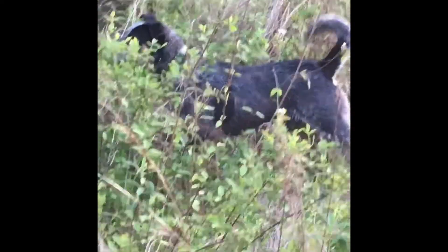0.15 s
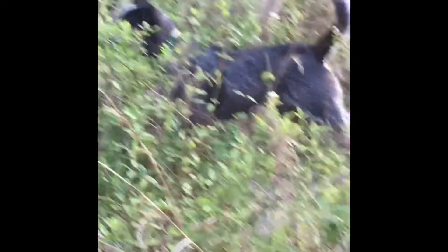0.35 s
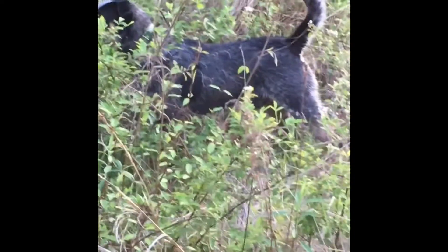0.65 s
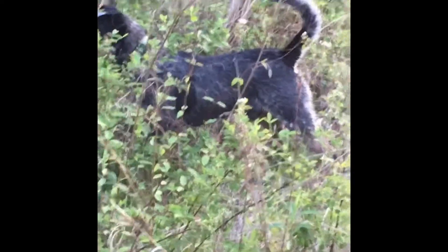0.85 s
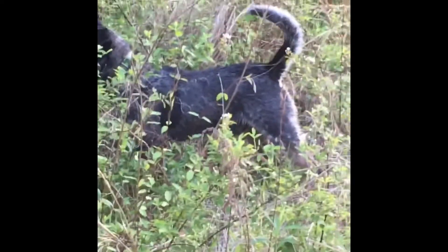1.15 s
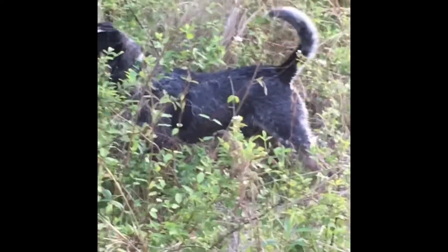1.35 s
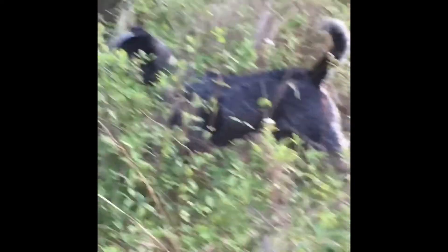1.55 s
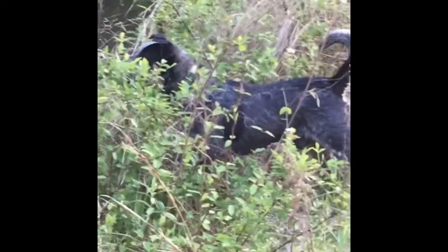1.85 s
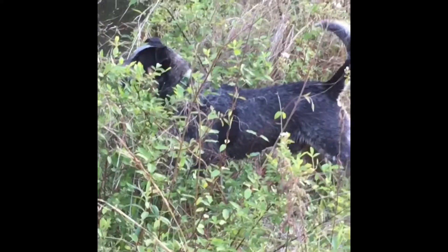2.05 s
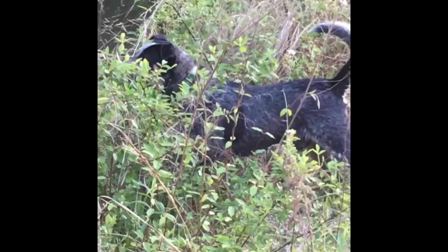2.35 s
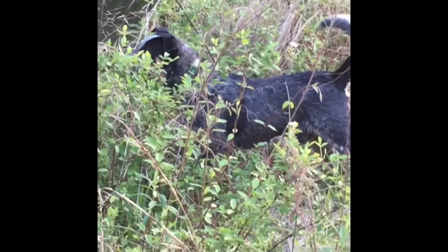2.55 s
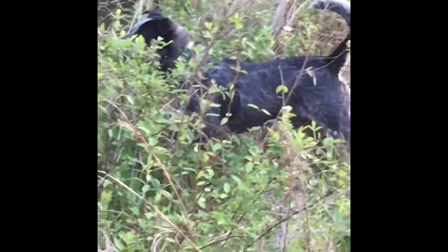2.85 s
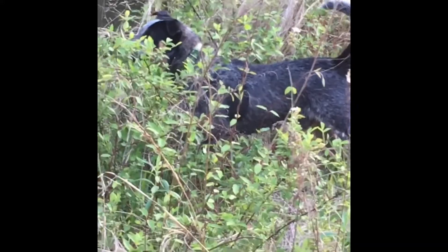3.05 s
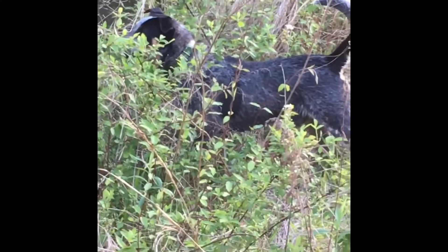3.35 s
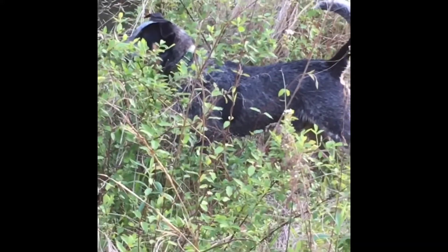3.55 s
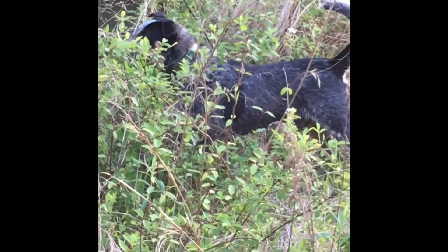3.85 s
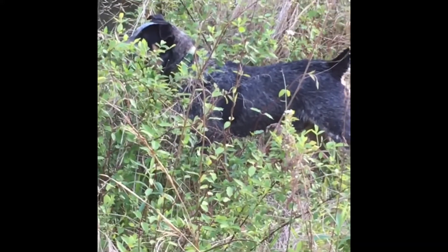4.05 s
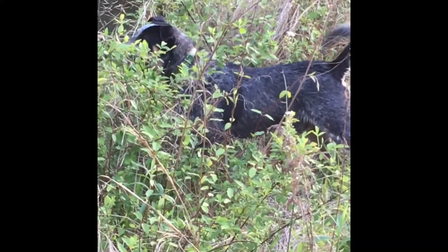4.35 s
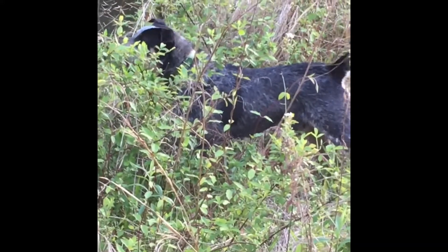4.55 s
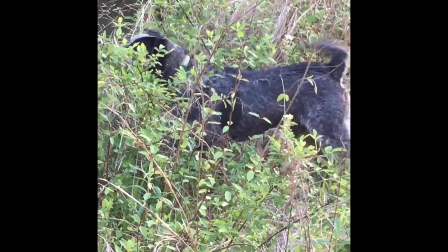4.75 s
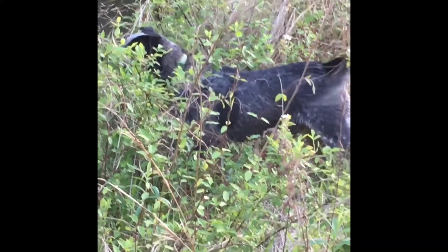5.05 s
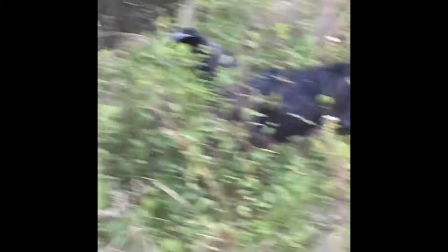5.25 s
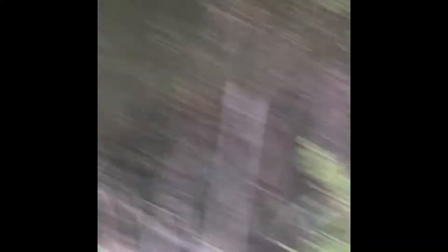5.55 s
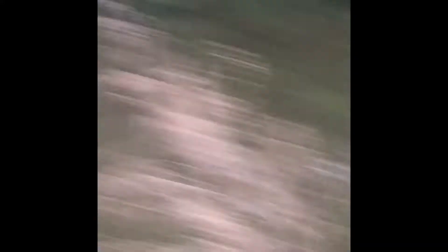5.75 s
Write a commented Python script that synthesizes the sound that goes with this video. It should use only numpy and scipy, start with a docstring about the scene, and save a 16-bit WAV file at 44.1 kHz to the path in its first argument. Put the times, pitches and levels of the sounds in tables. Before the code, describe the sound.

Outdoors by a pond, crickets and katydids drone over low wind rumble; late on, a large dog barks twice, sharp and very loud.

```python
"""On the bank of a pond, crickets drone with a far and a near katydid; wind rumbles at the microphone over a hum.
A frog gives one low, sagging note early on, and faint chirps and ticks follow; the near katydid pauses once.
Late on a large dog barks twice in the weeds: throat harmonics and rasp shaped by an opening jaw, plus hiss.
The near katydid stops at the first bark; weeds, far bank and trees return a long, faint echo of both,
and the camera's gain control turns everything down for a moment after each bark."""
import sys
import numpy as np
from scipy import signal
from scipy.fft import rfft, irfft, next_fast_len
from scipy.io import wavfile
from scipy.ndimage import uniform_filter1d, minimum_filter1d, map_coordinates

SR = 44100
rng = np.random.default_rng(int(sys.argv[2]) if len(sys.argv) > 2 else 0)


def unload_audio(sound):
    """Save the sound as a 16-bit wav file, at the path given as the first command line argument."""
    columns = np.transpose(np.atleast_2d(sound))
    # keep every value between -1 and 1, then stretch to whole-number steps
    steps = np.round(np.clip(columns, -1, 1) * 32767)
    wavfile.write(sys.argv[1], SR, steps.astype(np.int16))


N = 260454  # samples, about 5.9 s

# The two barks. Each row: top of the pitch in seconds, pitch there in Hz, rise in seconds, arch exponent,
# fall in Hz per second, open mouth resonance in Hz, brightness above about 1 kHz at the top in dB,
# hiss in dB (at 0 dB effort and the top pitch).
BARKS = [ (4.703, 570.6, .069, 2.0, 2306, 767, 4, -33.5), (5.544, 578.2, .064, 1.6, 2980, 940, 4, -35.5)]
# Loudness through each bark, one list per bark. Each row: time in seconds, level in dB.
BARK_LEVELS = [
    [(4.595, -54), (4.627, -29), (4.642, -10.5), (4.651, -12), (4.686, -8), (4.701, -0.5), (4.727, -6),
     (4.74, -17.5), (4.756, -11), (4.776, -31)],
    [(5.456, -38), (5.474, -17), (5.484, -15.5), (5.494, 1.5), (5.53, -8.5), (5.545, 0), (5.559, -9),
     (5.57, -22), (5.596, -20), (5.611, -50)],
]
# The dog's throat without the moving mouth resonance. Each row: frequency in Hz, relative gain in dB.
THROAT = [(100, -43), (300, -47), (420, -11.5), (560, 4), (950, 2.5), (1600, -4.5), (1900, -7.5),
          (2300, -10), (2800, -25), (3800, -38.5), (6200, -45), (8500, -55), (15000, -64)]
# Turbulence in the throat. Each row: frequency in Hz, relative level in dB per Hz.
RASP = [(100, -47), (250, -21), (340, -38.5), (480, 6), (700, 9), (1000, -5.5), (1500, -5.5), (2300, -12.5),
        (2900, -25), (3900, -44), (8000, -38), (15500, -46)]
# Air hissing past the teeth. Each row: frequency in Hz, relative level in dB per Hz.
TEETH = [(2500, -31), (3100, 1), (4000, -3.5), (5000, -2.5), (5900, 3), (6700, -3), (7400, -3), (8500, -17),
         (10000, -8), (12000, -17), (15500, -22)]
# Leaves close to the dog scatter treble best. Each row: frequency in Hz, relative level in dB.
WEEDS_COLOUR = [(400, -0.5), (1000, -2), (2500, 6), (6000, 9), (14000, 4)]
# Colour of the echo from bank and trees. Each row: frequency in Hz, relative level in dB.
BANK_COLOUR = [(300, 3.5), (550, 0), (760, -15.5), (1000, 8), (1350, -1.5), (1750, 6), (2600, -1.5),
               (3600, 7.5), (6000, -7.5), (12000, 11)]
# How long that echo rings. Each row: frequency in Hz, time to decay by 60 dB in seconds.
BANK_T60 = [(200, 2.6), (550, 1.27), (1200, 1.63), (2500, 1.52), (5000, 5.4), (12000, 1.42)]
# Cricket chorus. Each row: frequency in Hz, relative level in dB per Hz.
CRICKETS = [(3000, -26), (3750, -20), (4100, -7.5), (4400, 2), (4650, 3), (5100, -1.5), (5400, -18),
            (6000, -39)]
# Wing noise of the far katydid. Each row: frequency in Hz, relative level in dB per Hz.
FAR_WINGS = [(5800, -29), (6500, -20.5), (6900, -9), (7300, -5.5), (7600, -3.5), (7850, -12), (8100, -12),
             (9000, -39)]
# Loudness of the far katydid. Each row: time in seconds, level in dB.
FAR_KATYDID_LEVEL = [(0, -65.5), (1.3, -65), (2.8, -65), (3.1, -68), (3.6, -65.5), (5.9, -67)]
# Buzzes of the near katydid. Each row: start in seconds, end in seconds.
NEAR_KATYDID_BUZZES = [(-.1, 1.21), (1.345, 4.63)]
# The frog's note. Each row: start in seconds, length in seconds, starting pitch in Hz, starting level in dB.
FROG_NOTES = [(.757, 0.05, 336.5, -40.5)]
# Faint chirps and ticks. Each row: centre in seconds, frequency in Hz, bandwidth in Hz,
# length in seconds, peak level in dB (bandwidth and length are standard deviations of a bell).
CHIRPS = [(0.822, 2370, 110, .045, -74), (.845, 4000, 1500, .002, -63), (2.16, 6100, 450, .022, -77),
          (2.402, 6150, 350, .006, -73), (2.432, 6100, 350, .006, -72), (2.668, 6100, 350, .006, -74),
          (2.697, 6100, 350, .007, -71), (4.492, 2240, 350, 0.0057, -61), (5.603, 11000, 3520, 0.0008, -40)]
# Low wind rumble. Each row: frequency in Hz, relative level in dB per Hz.
RUMBLE = [(20, -40), (30, -19), (42, -4.5), (62, -4.5), (80, -1), (95, -3.5), (115, -8.5), (150, -19.5),
          (220, -25), (400, -32), (900, -57)]
# A low hum, before its waver. Each row: time in seconds, level in dB.
HUM_LEVEL = [(0, -54), (1.2, -63), (1.6, -47.5), (2.3, -52), (2.7, -51), (3.3, -52.5), (3.7, -45),
             (4.1, -51), (5.9, -52)]
# Colour of the distant rush. Each row: frequency in Hz, relative level in dB per Hz.
DISTANCE = [(100, -24), (250, -14), (400, -12), (600, -1), (880, 5), (1200, -3.5), (1600, -12),
            (2300, -20.5), (3000, -36), (6000, -43), (9700, -22), (10600, -45), (15500, -38)]
# Loudness of the distant rush, before its small drift. Each row: time in seconds, level in dB.
RUSH_LEVEL = [(0.0, -60), (0.69, -58.5), (2.44, -64), (3.03, -60), (3.72, -62), (4.4, -61)]

# Vocal folds: they begin to swing at START_HZ and are in full swing CATCH_HZ higher.
START_HZ, CATCH_HZ = 273.6, 25
# The voice breaks upward by BREAK_HZ shortly before its top, then rests there.
BREAK_HZ, BREAK_BEFORE_S, BREAK_WIDTH_S, TOP_HOLD_S = 76.54, .015, 0.0034, 0.0042
# Jaw: resonance nearly shut, time of widest opening before the top, widths of opening and closing.
SHUT_HZ, WIDEST_BEFORE_S, OPENING_S, CLOSING_S = 575, 0.028, 0.017, .017
# Hoarseness (0-1) at the start, and how fast it clears as the bark goes on.
ROUGH_START, CLEARING_PER_S = 0.94, 2.94
# Share of it lost while a harmonic sits on the mouth resonance, and how near it must be.
STEADYING, STEADY_WIDTH_HZ = 0.82, 46.5
RASP_DB, JITTER = -4, .035  # at full roughness: turbulence in dB, pitch scatter as a fraction
BRIGHTEN_DB_PER_OCTAVE = 8.5  # tense folds are brighter
STEADY_MELLOW_DB = 3  # before the break, steady folds have weaker overtones
MUFFLE_DB_PER_S = 267  # the closing lips muffle the end


def dog(t):
    """The dog in the weeds: each bark is one arch of pitch and one snap of the jaw, timed from the arch's top."""
    out = np.zeros(N)
    for row, levels in zip(BARKS, BARK_LEVELS):
        top_s, top_hz, rise_s, arch, fall_hz_per_s, open_hz, top_bright_db, hiss_db = row
        span = (t > levels[0][0]) & (t < levels[-1][0])
        age = t[span] - top_s
        pitch = pitch_arch(age, top_hz, rise_s, arch, fall_hz_per_s)

        jaw_s = np.where(age < -WIDEST_BEFORE_S, OPENING_S, CLOSING_S)
        jaw_opening = np.exp(-((age + WIDEST_BEFORE_S) / jaw_s) ** 2 / 2)
        mouth_hz = SHUT_HZ + (open_hz - SHUT_HZ) * jaw_opening

        steady = steadiness(pitch, mouth_hz)
        hoarse = ROUGH_START - CLEARING_PER_S * (age - age[0])
        rough = np.clip(hoarse * (1 - STEADYING * steady), 0, 1)

        tension_db = BRIGHTEN_DB_PER_OCTAVE * np.log2(pitch / top_hz)
        mellow_db = STEADY_MELLOW_DB * steady * (age < -BREAK_BEFORE_S)
        muffle_db = MUFFLE_DB_PER_S * np.maximum(age, 0)
        bright_db = top_bright_db + tension_db - mellow_db - muffle_db

        level_db, = curves(levels, t[span])
        out[span] += bark(pitch, level_db, mouth_hz, rough, bright_db, hiss_db)
    return out


def bark(pitch, level_db, mouth_hz, rough, bright_db, hiss_db, mouth_width_hz=150, mouth_db=10,
         split=0.17, flutter_db=6, hiss_follow=0.66, hiss_rise_db=8):
    """The folds sound through the throat and the mouth resonance; strain makes them split and rasp."""
    size = len(pitch)
    scattered_pitch = pitch * (1 + JITTER * rough * wobble(496.3, size))
    phase = 2 * np.pi * np.cumsum(scattered_pitch) / SR
    upper = lambda hz: 1 / (1 + (1100 / (hz + 1)) ** 6)  # the part of the spectrum that brightness lifts

    # whole orders are the voice; half orders appear when alternate cycles differ
    order = np.arange(2, 49)[:, None] / 2
    hz = order * pitch
    mouth = 1 + amp(mouth_db) / (1 + ((hz - mouth_hz) / mouth_width_hz) ** 2)
    flutter = flutter_db * rough * np.array([wobble(120.6, size) for _ in order])
    throat = amp(along(THROAT, hz) + bright_db * upper(hz) + flutter)
    strength = throat * mouth * np.where(order % 1, split * rough, 1)
    start_phase = rng.uniform(0, 2 * np.pi, order.shape)
    voice = np.sum(strength * np.sin(order * phase + start_phase), 0)
    voice /= np.sqrt(np.sum(strength ** 2, 0) / 2)  # even loudness, whatever the colour

    # air rushes through once per opening of the folds
    rasp = noise(RASP, size)
    rasp = rasp + (amp(bright_db) - 1) * filtered(rasp, upper)
    rasp *= 1 + 0.088 * np.cos(phase)
    share = np.clip(np.maximum(amp(RASP_DB) * rough, 1 - swing(pitch)), 0, 1)

    # the hiss swells with the pressure that also lifts the pitch
    pressure_db = hiss_follow * level_db + hiss_rise_db * np.log2(pitch / pitch.max())
    teeth = patchy(noise(TEETH, size), depth_db=4.5)
    sputter_db = 1.6 * wobble(140, size)
    hiss = amp(hiss_db + pressure_db + sputter_db) * teeth
    return amp(level_db) * (np.sqrt(1 - share ** 2) * voice + share * rasp) + hiss


def pitch_arch(age, top_hz, rise_s, arch, fall_hz_per_s):
    """Pitch climbs in an arch, levels off, breaks upward to its top at age 0, then sinks steadily."""
    to_climb = np.clip((-age - BREAK_BEFORE_S) / (rise_s - BREAK_BEFORE_S), 0, 1)
    climb = (top_hz - BREAK_HZ - START_HZ) * to_climb ** arch
    unbroken = (1 - np.tanh((age + BREAK_BEFORE_S) / BREAK_WIDTH_S)) / 2
    fall = fall_hz_per_s * np.maximum(age - TOP_HOLD_S, 0)
    return top_hz - BREAK_HZ * unbroken - climb - fall


def steadiness(pitch, mouth_hz):
    """Near 1 while one of the two lowest harmonics rides on the mouth resonance and steadies the folds."""
    miss_hz = np.minimum(np.abs(pitch - mouth_hz), np.abs(2 * pitch - mouth_hz))
    return swing(pitch) * np.exp(-(miss_hz / STEADY_WIDTH_HZ) ** 2 / 2)


def swing(pitch):
    """0 while air only rasps through the slack folds, 1 once they have caught."""
    return np.clip((pitch - START_HZ) / CATCH_HZ, 0, 1)


def patchy(x, depth_db):
    """Brief, narrow whistles come and go in a noise."""
    z = signal.stft(x, nperseg=256)[2]
    field = uniform_filter1d(rng.standard_normal(z.shape), size=3, axis=0)  # over frequency
    field = uniform_filter1d(field, size=6, axis=1)  # over time
    return unit(signal.istft(z * amp(depth_db * unit(field)), nperseg=256)[1][:len(x)])


def echoes(x, weeds_db=-14, weeds_t60=0.66, bank_db=-17.0, bank_rise=0.038,
           return_at=0.253, return_width=0.019, return_gain=0.31, twigs_db=-15):
    """Nearby weeds scatter the sound at once; trees return it slowly, with a swell from the far bank."""
    hz, t, z = signal.stft(rng.standard_normal(2 * SR), SR, nperseg=256)
    decay_db = -60 * t / along(BANK_T60, hz)[:, None]
    bank = signal.istft(z * amp(along(BANK_COLOUR, hz)[:, None] + decay_db), SR, nperseg=256)[1]
    age = np.arange(len(bank)) / SR
    bank *= 1 - np.exp(-age / bank_rise)
    bank *= 1 + return_gain * np.exp(-((age - return_at) / return_width) ** 2 / 2)

    weeds = noise(WEEDS_COLOUR, len(age)) * amp(-60 * age / weeds_t60)

    # ground and stems close to the dog send a few distinct copies
    twigs = np.zeros(len(age))
    arrivals = (rng.uniform(.003, .02, size=8) * SR).astype(int)
    twigs[arrivals] = rng.standard_normal(size=8)

    parts = [(twigs_db, twigs), (weeds_db, weeds), (bank_db, bank)]
    tail = sum(amp(db) * part / np.linalg.norm(part) for db, part in parts)
    return signal.fftconvolve(x, tail)[:N]


def frog(t, attack_s=0.0055, fade_db_per_s=55, release_db_per_s=900, sag_hz_per_s=520):
    """One short, pure tone that sags in pitch and fades, faster once its length is over."""
    out = np.zeros(N)
    for start, length, hz, db in FROG_NOTES:
        age = np.maximum(t - start, 0)
        release_db = release_db_per_s * np.maximum(age - length, 0)
        level_db = db - fade_db_per_s * age - release_db
        phase = 2 * np.pi * np.cumsum(hz - sag_hz_per_s * age) / SR
        attack = 1 - np.exp(-age / attack_s)
        out += amp(level_db) * attack * np.sqrt(2) * np.sin(phase)
    return out


def insects(t, crickets_db=-61.0, near_db=-71.5, far_strokes_hz=52, near_strokes_hz=54.6):
    """Crickets blur into banded noise; each katydid's wing sound pulses at its own stroke rate."""
    drift_db = .3 * wobble(4, N)
    chorus = amp(crickets_db + drift_db) * noise(CRICKETS, N)

    far_level_db, = curves(FAR_KATYDID_LEVEL, t)
    far = amp(far_level_db) * noise(FAR_WINGS, N) * wing_strokes(far_strokes_hz, depth=.36)

    # 10 ms ramps inside each end of a buzz
    singing = sum(np.clip(np.minimum(t - start, end - t) / .01, 0, 1) for start, end in NEAR_KATYDID_BUZZES)
    # the near wing rings around one pitch, slightly scratchy
    ring = np.sin(2 * np.pi * np.cumsum(8330 + 90 * wobble(440, N)) / SR)
    near = amp(near_db) * singing * unit(ring) * wing_strokes(near_strokes_hz, depth=2.6)
    return chorus + far + near


def wing_strokes(rate_hz, depth):
    """Loudness, rms 1, of a wing that scrapes about rate_hz times a second."""
    phase = 2 * np.pi * np.cumsum(rate_hz * (1 + .003 * wobble(3, N))) / SR
    return unit(np.maximum(1 + depth * np.cos(phase), 0))


def chirps(t):
    """Small calls and ticks: noise bands that swell and fade as bells in time, without sharp edges."""
    return sum(amp(db) * np.exp(-((t - s) / length) ** 2 / 2) * narrow(hz, width)
               for s, hz, width, length, db in CHIRPS)


def wind(t, rumble_db=-49.5, gust_db=0.54, gusts_per_s=4.87, hum_hz=81):
    """Light wind rumbles as low noise at the microphone, with a wavering hum and the soft rush of the distance."""
    rumble = amp(rumble_db + gust_db * wobble(gusts_per_s, N)) * noise(RUMBLE, N)

    hum_level_db, = curves(HUM_LEVEL, t)
    waver = amp(1.2 * wobble(9, N))
    hum_tone = np.sin(2 * np.pi * np.cumsum(hum_hz + 3 * wobble(9.6, N)) / SR)
    hum = amp(hum_level_db) * waver * unit(hum_tone)

    rush_level_db, = curves(RUSH_LEVEL, t)
    rush = amp(rush_level_db + 0.16 * wobble(6.9, N)) * noise(DISTANCE, N)
    return rumble + hum + rush


def amp(db):
    """Decibels to gain."""
    return 10 ** (np.asarray(db) / 20)


def unit(x):
    """Scaled to rms 1."""
    return x / np.sqrt(np.mean(x ** 2) + 1e-20)


def along(points, hz):
    """(Hz, value) points read on a log frequency axis."""
    f, v = np.transpose(points)
    return np.interp(np.log(hz + 1), np.log(f + 1), v)


def curves(rows, t):
    """Each column after the first, read at the times t."""
    s, *cols = np.transpose(rows)
    return [np.interp(t, s, c) for c in cols]


def wobble(rate, size):
    """A smooth random curve with rate knots a second."""
    knots = rng.standard_normal(int(size * rate / SR) + 4)
    return map_coordinates(knots, [np.arange(size) * rate / SR])


def filtered(x, response):
    """x shaped by a gain that depends on frequency."""
    m = next_fast_len(len(x) + 8192)
    return irfft(rfft(x, m) * response(np.fft.rfftfreq(m, 1 / SR)), m)[:len(x)]


def noise(spectrum, size):
    """Noise of rms 1 with the given (Hz, dB) colour."""
    return unit(filtered(rng.standard_normal(size), lambda hz: amp(along(spectrum, hz))))


def narrow(hz, width):
    """Noise of rms 1 in one bell-shaped band."""
    return unit(filtered(rng.standard_normal(N), lambda f: np.exp(-((f - hz) / width) ** 2 / 2)))


def scene():
    """Everything heard from the bank, summed at one microphone."""
    t = np.arange(N) / SR
    barks = dog(t)
    return (barks + echoes(barks) + frog(t) + insects(t) + chirps(t) + wind(t))[None]


def gain_control(x, threshold_db=-20, slope=0.18, hold=0.2, lag=0.0047):
    """Loud sound turns the gain down; it stays down for hold seconds, then returns."""
    level_db = 10 * np.log10(np.abs(uniform_filter1d(x ** 2, size=256)) + 1e-12)
    cut_db = np.minimum(threshold_db - level_db, 0) * slope
    half = int(hold * SR / 2)
    held = minimum_filter1d(cut_db, 2 * half + 1, origin=half)  # deepest cut of the last hold seconds
    keep = np.exp(-1 / (lag * SR))
    return x * amp(signal.lfilter([1 - keep], [1, -keep], held))


def limiter(x, size=128):
    """A fast look-ahead limiter keeps the peaks within full scale; size is in samples."""
    needed = np.minimum(1, 1 / (np.abs(x) + 1e-9))
    return x * uniform_filter1d(minimum_filter1d(needed, 2 * size), size)


def record(dry, low_cut_hz=38, top_hz=15720):
    """The camera's gain control, a peak limiter and the camera's band limits."""
    x = limiter(gain_control(dry[0]))
    low_cut = lambda hz: 1 / np.sqrt(1 + (low_cut_hz / (hz + 1)) ** 12)
    return filtered(x, lambda hz: low_cut(hz) * (hz < top_hz))[None]


dry = scene()
out = record(dry)
unload_audio(out)
```